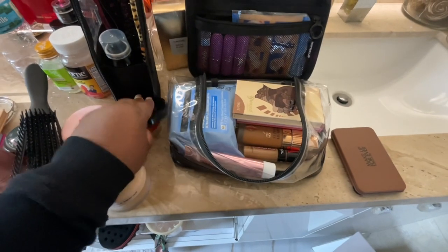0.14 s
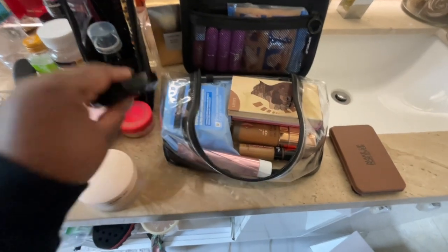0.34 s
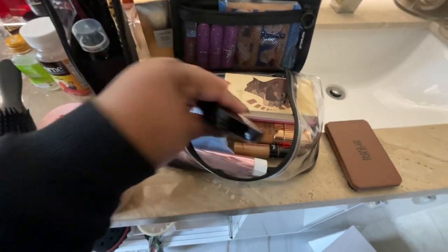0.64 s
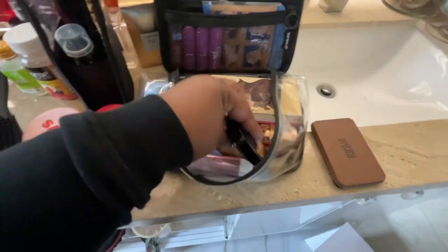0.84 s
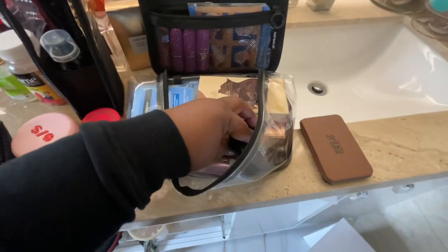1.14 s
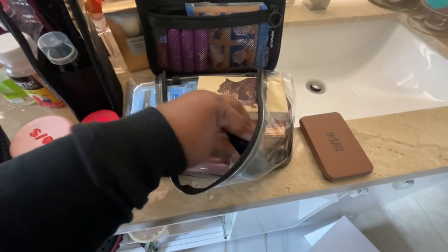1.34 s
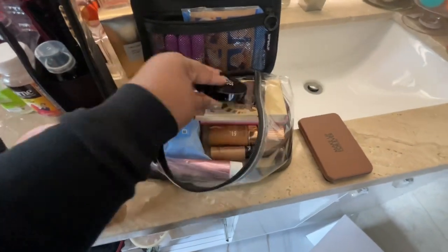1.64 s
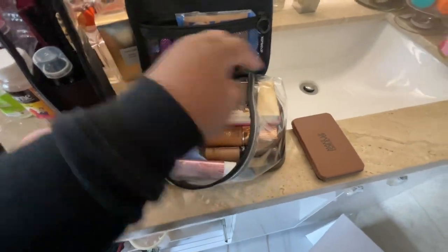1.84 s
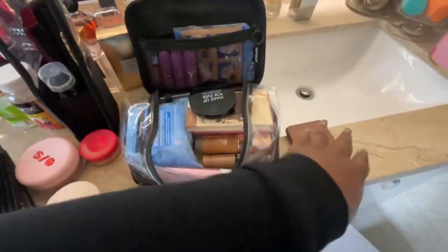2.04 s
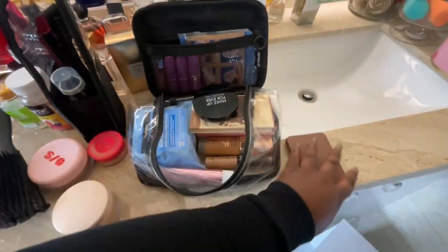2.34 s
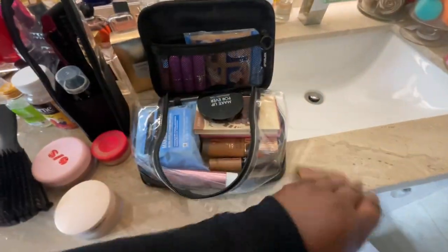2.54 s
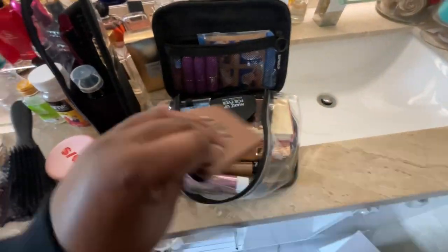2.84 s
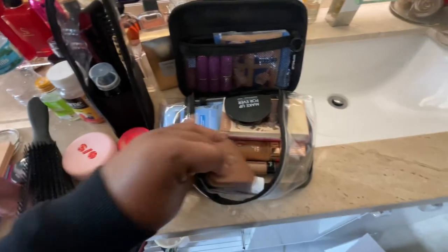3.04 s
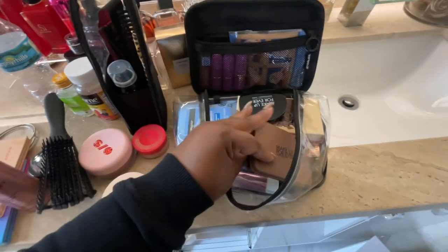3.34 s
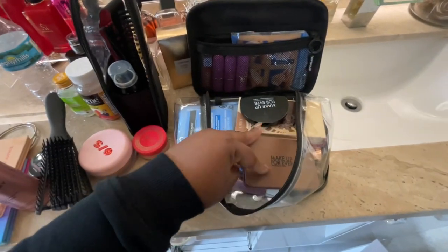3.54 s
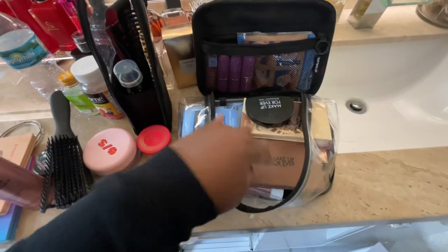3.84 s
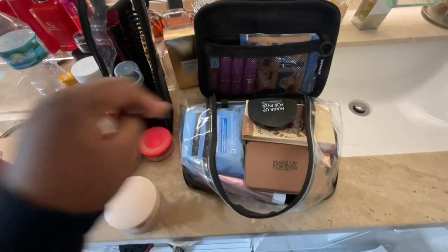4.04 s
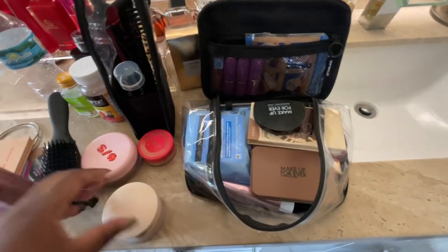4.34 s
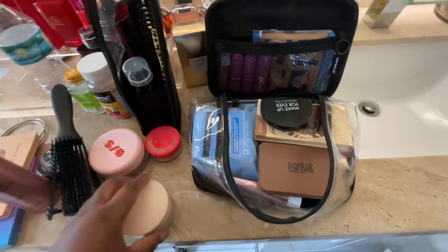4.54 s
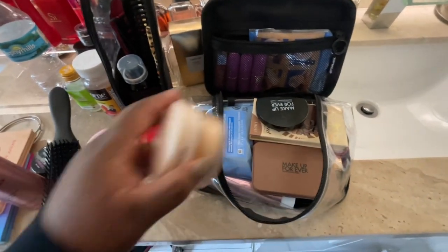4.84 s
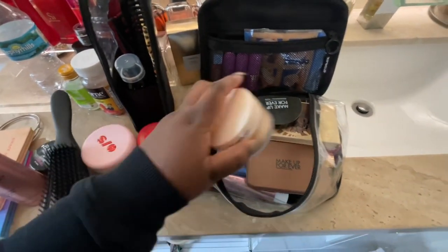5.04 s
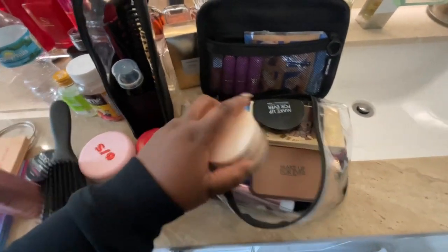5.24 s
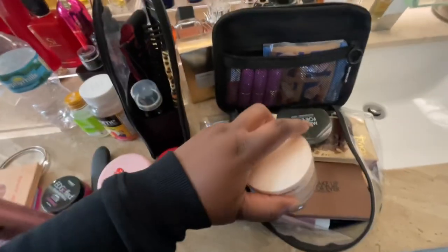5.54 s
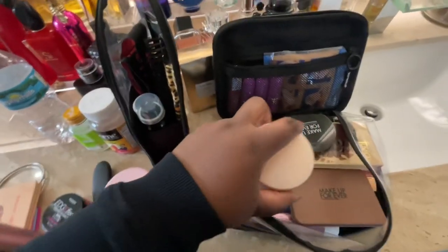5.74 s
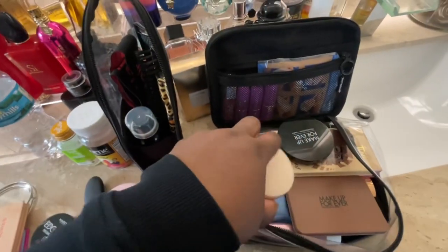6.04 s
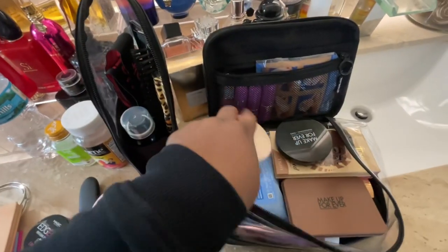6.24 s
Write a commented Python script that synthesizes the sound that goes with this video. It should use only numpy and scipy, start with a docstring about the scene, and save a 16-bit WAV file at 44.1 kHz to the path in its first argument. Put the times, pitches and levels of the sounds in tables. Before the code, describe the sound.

Under a steady low fan drone, hard plastic cases snap and rattle together in a bag, with faint rustling and a short bathroom echo.

```python
"""A hand packs plastic compacts and jars into a vinyl bag on a bathroom counter under a droning vent fan. A
small bottle rings early at the left; the fan is shaped noise over a rumble, and the background steps up near
1.1 s. A compact, from 2 s a palette, from 4.2 s a jar click and knock: noise cracks, damped shell modes and
thuds. Grainy clatter, dry ticks and hissing rustle run among them, and tiles return a short tail of sparse
taps. Near 5.5 s a brief low boom swells up; from 6 s the jar is pushed onto a soft pack with duller treble."""
import sys
import numpy as np
from scipy import signal
from scipy.fft import rfft, irfft, next_fast_len
from scipy.io import wavfile
from scipy.ndimage import uniform_filter1d

SR = 44100
rng = np.random.default_rng(int(sys.argv[2]) if len(sys.argv) > 2 else 0)


def store_wav(level_fs):
    """Save 16-bit WAV to argv[1]."""
    pcm = np.round(np.clip(np.atleast_2d(level_fs), -1, 1) * 32767)
    wavfile.write(sys.argv[1], SR, pcm.T.astype(np.int16))


N = 281799
ONSET_S = 0.004  # silence ahead of each blow, room for its filter to start


def gain_of(db):
    """Level law: dB to amplitude ratio."""
    return 10 ** (np.asarray(db) / 20)


def evened(x):
    """Power normalisation: scales to rms 1."""
    return x / np.sqrt(np.mean(x ** 2) + 1e-20)


def read(points, hz):
    """Log-frequency interpolation: reads a spectrum table between its points."""
    f, value = np.transpose(points)
    return np.interp(np.log(hz + 1), np.log(f + 1), value)


def add(mix, s, sound):
    """Superposition: adds a sound to the mix at time s."""
    part = mix[:, round(s * SR):][:, :sound.shape[1]]
    part += sound[:, :part.shape[1]]


def swells(rows):
    """Exponential growth and decay: strokes are straight lines in dB, and their powers add."""
    t = np.arange(N) / SR
    power = 0
    for s, db, swell, fade in rows:
        drop_db = 20 * np.maximum((s - t) / swell, (t - s) / fade)
        power = power + gain_of(2 * (db - drop_db))
    return np.sqrt(power)


def hiss(field_db, size):
    """Diffuse-field coherence: two partly alike noises from random spectra, at levels field_db(t, hz)."""
    # Each row: frequency in Hz, left-right likeness (1 is identical).
    likeness = [(60, 1), (320, 0.85), (430, 0.28), (2000, 0.087), (11500, 0.3)]
    frames, hz = 4 * N // size + 5, np.fft.rfftfreq(size, 1 / SR)
    a, b, c, d = rng.standard_normal((frames, len(hz), 4)).T
    same = np.clip(read(likeness, hz), -1, 1)[:, None]
    left = a + 1j * b
    right = same * left + np.sqrt(1 - same ** 2) * (c + 1j * d)
    frame_s = np.arange(frames) * size / 4 / SR
    spectra = np.array([left, right]) * gain_of(field_db(frame_s, hz[:, None]))
    return signal.istft(spectra, nperseg=size, noverlap=3 * size // 4)[1][:, :N]


def fan():
    """Duct resonance: air noise is reinforced at the duct's modes, over a low rumble."""
    # Each row: time in seconds, drone level and low rumble level in relative dB.
    drone = [(0, -51, -59), (1.04, -50, -55), (1.12, -41.5, -44.5), (3.06, -42, -40.5), (3.5, -41.5, -46),
             (5.2, -42, -47), (5.5, -35.5, -34.5), (5.75, -41.5, -48)]
    # Spectrum of the air noise. Each row: frequency in Hz, relative level in dB per Hz.
    air = [(47, -29.5), (95, -31), (120, -17.5), (163, -27), (271, -12.5), (431, -22), (820, -28.5),
           (4900, -47), (5800, -54), (13000, -65), (14500, -85)]
    # Duct modes. Each row: frequency in Hz, width between the points 6 dB down in Hz, relative level in dB.
    duct = [(121, 11, 2), (272.5, 21, -9.5), (354, 12.6, -16), (518, 17.6, -19), (1290.4, 16, -26)]
    s, drone_db, rumble_db = np.transpose(drone)

    def field_db(t, hz):
        peaks = sum(gain_of(2 * db) / (1 + (2 * (hz - f) / w) ** 2) ** 2 for f, w, db in duct)
        rumble_power = gain_of(2 * np.interp(t, s, rumble_db - drone_db))
        rumble = rumble_power / (1 + (2 * (hz - 59) / 30) ** 2) ** 3
        return 10 * np.log10(peaks + rumble + gain_of(2 * (read(air, hz) - 3.0)))

    level_db = np.interp(np.arange(N) / SR, s, drone_db) + 1.5
    return evened(hiss(field_db, size=4096)) * gain_of(level_db)


def rustle():
    """Stick-slip friction: sleeve and bag hiss, flickering in time and in patches as fibres catch."""
    # Spectrum of the rub. Each row: frequency in Hz, relative level in dB per Hz.
    cloth = [(300, -8), (1000, 1), (8500, -4), (11500, -4), (13500, -10), (14300, -47.5)]
    # Strokes of sleeve and bag. Each row: turning moment in seconds, relative level there in dB,
    # seconds to swell by 20 dB, seconds to fade by 20 dB (negative: it goes on rising at that pace).
    strokes = [(.16, -67, 0.04, 0.02), (2.15, -67.5, 0.5, 1.5), (2.51, -52, 0.26, 0.23),
               (2.8, -64, .5, 0.1), (3.045, -52, 0.06, 0.07), (3.76, -58.5, 0.75, 0.1),
               (4.5, -70.5, 0.05, 0.1), (4.78, -69.5, 0.2, 0.05), (5.4, -65, .4, .5),
               (6.32, -55, 0.32, -0.5)]
    pressed_s = 5.2  # from here the hand presses on the soft pack and the rustle is duller
    duller_db = -3   # per octave above 4 kHz

    def field_db(t, hz):
        flicker = evened(uniform_filter1d(rng.standard_normal(len(t)), size=4))
        patches = uniform_filter1d(rng.standard_normal((len(t), len(hz))).T, size=20, axis=0)
        patches = evened(uniform_filter1d(patches, size=24, axis=1))
        dull_db = duller_db * np.log2(np.maximum(hz / 4000, 1)) * (t > pressed_s)
        return read(cloth, hz) + dull_db + 1.6 * flicker + 1.6 * patches

    return evened(hiss(field_db, size=256)) * swells(strokes) * gain_of(5.5)


def bathroom(x):
    """Reverberant decay: sparse taps of random sign, each band dying at its own speed; three tails take turns."""
    # Each row: frequency in Hz, time to decay by 60 dB in seconds.
    tiles = [(300, 0.27), (3000, 0.28), (11000, 0.24), (14500, 0.013)]
    out = np.zeros((2, N))
    turn = np.arange(N) / SR * 2 * np.pi * 3.3
    for k in range(3):
        taps = np.zeros((2, SR // 2))
        # one tap at a random place in every 20 samples
        jitter = rng.integers(0, 20, (2, (SR // 2 - 121) // 20))
        at = np.arange(120, SR // 2 - 20, 20) + jitter
        np.put_along_axis(taps, at, rng.choice([-1., 1.], at.shape), axis=1)
        hz, t, z = signal.stft(taps, SR, nperseg=256)
        decay = gain_of(-60 * t / read(tiles, hz)[:, None])
        tail = signal.istft(z * decay, SR, nperseg=256)[1]
        share = np.sqrt(2 / 3) * np.cos(turn + k * np.pi / 3)  # the three squared shares sum to 1
        out += signal.fftconvolve((x * share)[None], tail / np.linalg.norm(tail[0]), axes=1)[:, :N]
    return out


def bottle():
    """Free vibration: a small bottle is brushed and two of its modes die away."""
    # Each row: frequency in Hz, relative level in dB, time to decay by 60 dB in seconds.
    bottle_modes = [(2780, -43.5, 0.031), (4797, -37.5, 0.023)]
    t = np.arange(4096) / SR
    ring = sum(gain_of(db - 60 * t / t60) * np.sin(2 * np.pi * hz * t) for hz, db, t60 in bottle_modes)
    return ring * np.array([[2], [0], [.3]])  # far left; the third row feeds the room


def clatter():
    """Shot noise: lids and neighbours clatter in dense tiny knocks of uneven size as things slide and settle."""
    # Each row: loudest moment in seconds, relative level in dB, seconds to swell by 20 dB,
    # seconds to fade by 20 dB, frequency in Hz about which the grit is centred.
    slides = [(1.710, -30, .005, .025, 5500), (1.74, -43, 0.0053, 0.13, 4000), (2.52, -57, .15, .12, 4500),
              (3.285, -42.5, 0.0655, 0.09, 3000), (3.69, -42, .03, 0.0554, 4500),
              (5.113, -42, 0.0134, 0.06, 1500), (5.131, -27, .005, .025, 4000),
              (5.425, -35.5, .035, 0.07, 2800), (5.505, -39, 0.0332, 0.13, 3200),
              (6.29, -47, .15, .12, 1500)]
    grains_per_s, grain_spread_db = 1500, 4.5
    grit_octaves, body_hz, body_db, dull_hz = 1.1, 900, 5, 13000  # reach of grit, hollow body under it, top
    struck = rng.random(N) < grains_per_s / SR
    knocks = struck * gain_of(grain_spread_db * rng.standard_normal(N))
    grit = rng.standard_normal((3, N))
    # left, right and the room's feed share the first noise; each knock is a short burst
    grit = (grit[0] + .6 * grit) * evened(uniform_filter1d(knocks, size=48))
    hz, out = np.fft.rfftfreq(N, 1 / SR) + 1, 0
    for *stroke, grit_hz in slides:
        grit_colour = 1 / (1 + (np.log2(hz / grit_hz) / grit_octaves) ** 2) ** 2
        body_colour = gain_of(body_db) / (1 + (hz / body_hz) ** 2)
        colour = (grit_colour + body_colour) / (1 + (hz / dull_hz) ** 20)
        out = out + rfft(grit * swells([stroke])) * evened(colour)
    return irfft(out, N)


def hit(click_db, knock_db, thud_db, thud_hz, contact_hz, sizzle_db, thud_t60, shell):
    """Impact excitation of modes: a gritty crack rings the damped shell; the packed bag answers with a thud."""
    near_db, near_octaves = 7.5, 0.23  # lift and reach of the contact among the modes
    mode_spread_db = 1.2               # each blow lands elsewhere on the shell
    t = np.maximum(np.arange(4096) / SR - ONSET_S, 0)
    hz = np.fft.rfftfreq(4096, 1 / SR)
    grit = rng.standard_normal((3, 4096))
    crack = (grit[0] + 0.62 * grit[1:3]) * (1 - np.exp(-t / 0.00025)) * np.exp(-t / 0.0015)

    modes = []
    for f, db in shell:
        lift_db = near_db / (1 + (np.log2(f / contact_hz) / near_octaves) ** 2)
        modes.append((f, gain_of(db + lift_db + mode_spread_db * rng.standard_normal())))
    ring = 0
    for f, g in modes:
        # the two channels differ slightly in phase
        cycles = f * t + rng.random() + 0.32 * rng.random((2, 1))
        ring = ring + g * np.sin(2 * np.pi * cycles)
    ring = ring * (1 - np.exp(-t / 0.0006)) * gain_of(-60 * t / 0.013)

    # one colour for the whole blow: raised about the modes, with knock below and sizzle above
    lively_db = sum(2.2 * g / (1 + ((hz - f) / 380) ** 2) for f, g in modes)
    balance = [(300, knock_db + 11.0), (900, knock_db + 17.5), (1500, knock_db + 5.0), (2500, -0.62),
               (6000, 0.5 * sizzle_db), (8500, sizzle_db), (12000, sizzle_db),
               (16000, 2 * sizzle_db - 8.0)]
    colour = gain_of(lively_db + read(balance, hz))
    thud = gain_of(thud_db + 13) * np.sin(2 * np.pi * thud_hz * t) * (1 - np.exp(-t / 0.0018))
    direct = 1.596 * irfft(rfft(crack + 0.54 * ring) * colour) + thud * gain_of(-60 * t / thud_t60)
    # third row, what spreads into the room: the same colour, its grit evened out over all directions
    spread = 9 * irfft(colour * np.exp(-2j * np.pi * hz * ONSET_S))
    spread = spread + 2.05 * thud * gain_of(-60 * t / 0.015)
    return gain_of(click_db) * np.vstack([direct, spread])


def scene():
    """Superposition: blows, clatter, ticks and bottle with their room tail, over rustle and fan."""
    # Blows. Each row: start in seconds, relative click level in dB, knock and thud against the click in dB,
    # thud frequency in Hz, contact frequency in Hz (the shell modes near it ring most).
    blows = [(0.1645, -41, -7.5, -15.5, 532, 2600), (1.0567, -36.5, -4.5, -5, 327, 2650),
             (1.296, -33.5, -10, -28.5, 554, 5400), (1.6124, -16, -6, -4.5, 390, 2650),
             (1.7128, -25, -2, -3, 506, 1900), (1.731, -20.5, -14, -8.5, 332, 3800),
             (1.735, -20.5, -19, -10.5, 300, 5400), (3.055, -33, 5, 4.5, 255, 2450),
             (3.1983, -41, 0.5, -16, 236, 2900), (3.2239, -37.5, -5, -5.5, 415, 2900),
             (3.262, -23, -2.5, -21, 317, 2490), (3.2726, -26, 0.5, -15, 557, 2500),
             (3.2929, -27.5, -7, -10.5, 349, 3450), (3.2987, -27, -7, -11, 570, 4750),
             (3.3245, -37, -2, -1.5, 324, 3450), (3.3533, -19.5, -5.5, -15, 570, 4700),
             (3.3626, -33.5, 2.5, 0.5, 260.5, 3450), (3.5001, -24.5, -11, -16.5, 457, 5060),
             (3.6647, -30.5, 8.5, 5.5, 387, 6000), (3.6764, -28, -5.5, -7.5, 315, 6000),
             (5.1193, -22, -11, -16, 537, 6000), (5.133, -16.5, -11, -25, 478.5, 5500),
             (5.307, -26.5, -9, -19.5, 481, 1390), (5.4196, -16, -13.5, -20, 312, 1950),
             (5.4341, -29.5, -4, 0, 292, 4450), (5.4888, -19.5, -13.5, -21, 263, 2100),
             (5.497, -25, -10.5, -8, 285.7, 3300), (5.5358, -34, -4, -0.5, 284, 2800),
             (6.1765, -44, 4.5, 6, 314.5, 3300), (6.2247, -47, 2, 10, 252, 1950),
             (6.238, -36, 6, -4, 304.5, 2800), (6.3058, -36, 2, 6.5, 552.6, 2800),
             (6.3182, -25.5, -9, -16, 365.5, 4400), (6.368, -37.5, 1, -4, 400.5, 2800)]
    # Held in turn: round compact, flat palette, jar, then the jar pushed onto a soft pack.
    # Each entry: time at which it is taken up in seconds.
    taken_s = [0, 2.0, 4.2, 6.0]
    # Each entry: treble of the held object against its click in dB.
    sizzle_db = [-4.5, -9, -12, -23]
    # Each entry: time in which the bag's boom under the held object decays by 60 dB in seconds.
    thud_t60_s = [0.027, 0.028, 0.058, 0.033]
    # Shell modes of compact, palette and jar. Each row: frequency in Hz, relative level in dB.
    compact = [(950, -6), (2000, -5.5), (2650, -3.5), (5400, -4)]
    palette = [(2480, -5), (3480, -10), (4750, -3.5), (6000, -10.5)]
    jar = [(1250, -7.5), (1930, -8), (2700, -4.5), (3350, -8.5), (4450, -5), (5550, -6)]
    # Dry bright ticks, perhaps the vinyl creasing. Each row: start in seconds, relative level in dB.
    ticks = [(.158, -49), (0.9184, -58), (1.1, -51), (1.6902, -27), (2.1803, -54), (2.3839, -41),
             (3.656, -40), (4.602, -46.5), (5.8392, -49.5), (5.878, -46.5)]
    tick_hz = 418.6
    tick_knock_db, tick_thud_db, tick_sizzle_db = -13.5, -41.5, 1.5  # against the click

    shells = [compact, palette, jar, jar]
    hits = clatter()
    for s, *row in blows:
        held = np.searchsorted(taken_s, s) - 1
        add(hits, s - ONSET_S, hit(*row, sizzle_db[held], thud_t60_s[held], shells[held]))
    for s, db in ticks:
        tick = hit(db, tick_knock_db, tick_thud_db, tick_hz, tick_hz, tick_sizzle_db, thud_t60_s[0], shell=[])
        add(hits, s - ONSET_S, tick)
    add(hits, .1722, bottle())
    tail = bathroom(hits[2])
    return hits[:2] + gain_of(-6) * tail + rustle() + fan()


def record(dry):
    """Interchannel difference: two microphone ports differ in phase and level and lose deep bass and top."""
    # Each row: frequency in Hz, phase by which the left leads in radians.
    lead = [(320, -.6), (430, 1.1), (900, 1.9), (2800, 3.3), (4900, 9.3), (9200, 15.2), (11500, 12.8),
            (14000, 9.7)]
    # Each row: frequency in Hz, left level over right in dB.
    lean = [(92, 0), (330, -3), (770, 1), (5500, 3), (9800, -7), (15000, 6)]
    edge_hz = 16300
    size = next_fast_len(N + 4096)
    hz = np.fft.rfftfreq(size, 1 / SR)
    port = gain_of(read(lean, hz) / 2) * np.exp(.5j * read(lead, hz))  # half the difference to each side
    bass_cut = 1 + (42 / (hz + 1)) ** 4
    heard = irfft(rfft(dry, size) * np.array([port, 1 / port]) / bass_cut, size)[:, :N]
    band_limit = signal.firwin(511, edge_hz, window=("kaiser", 9), fs=SR)
    return signal.oaconvolve(heard, band_limit[None], "same")


dry = scene()
out = record(dry)
store_wav(out)
```